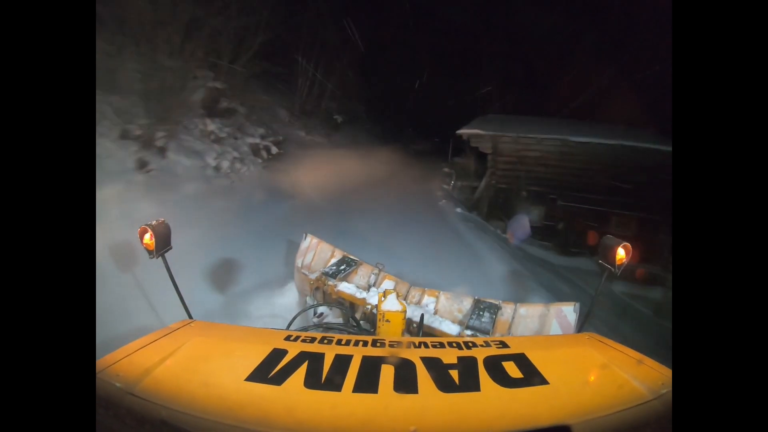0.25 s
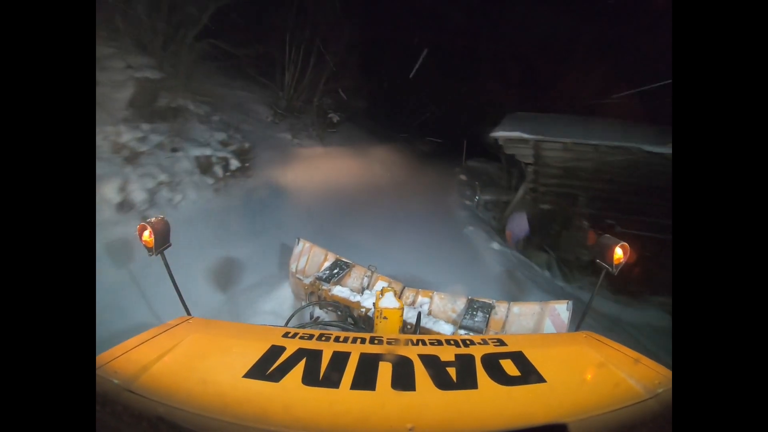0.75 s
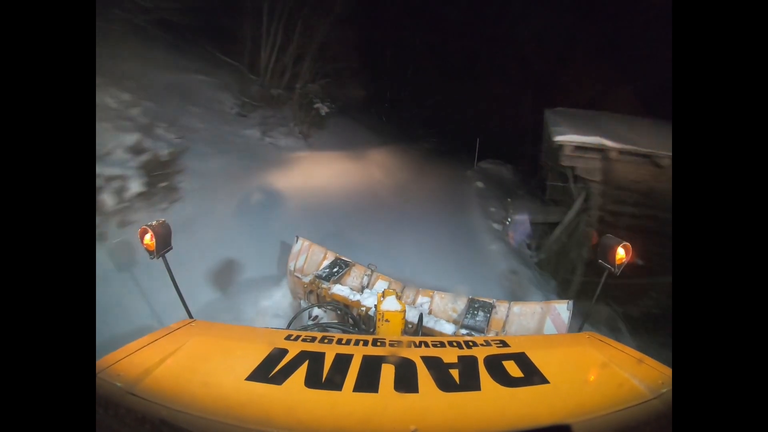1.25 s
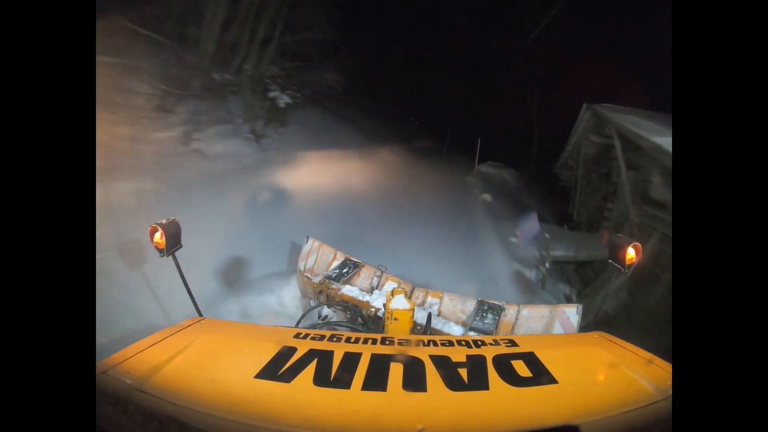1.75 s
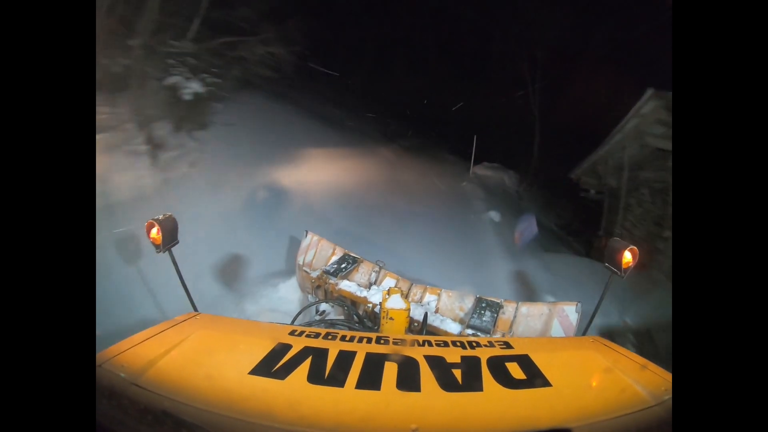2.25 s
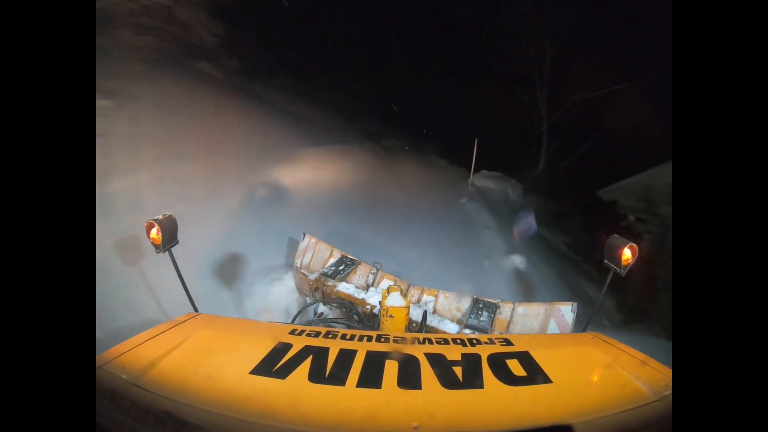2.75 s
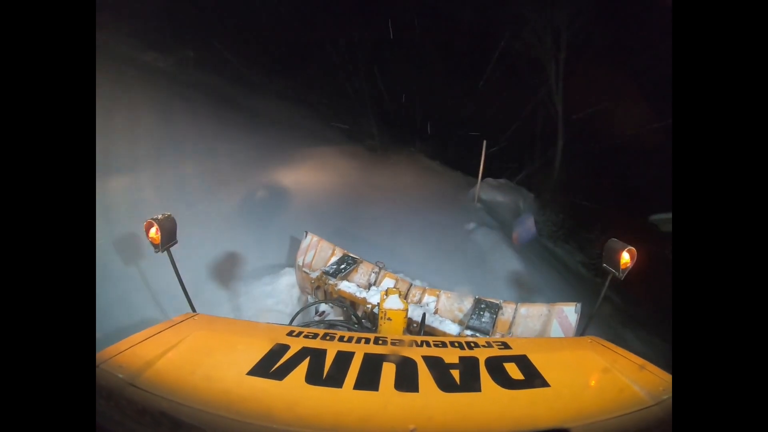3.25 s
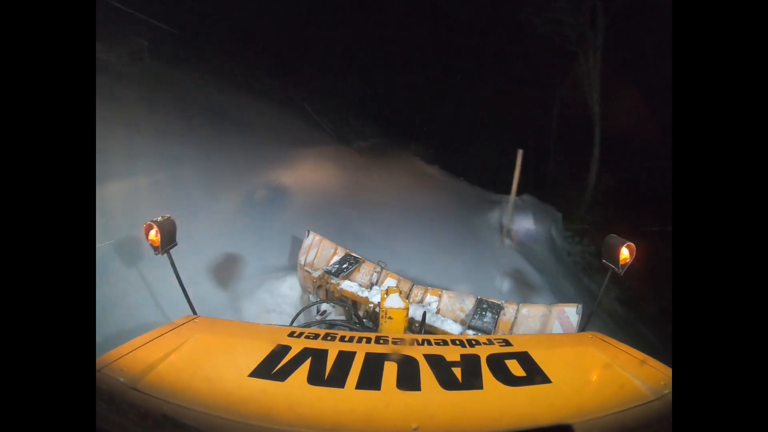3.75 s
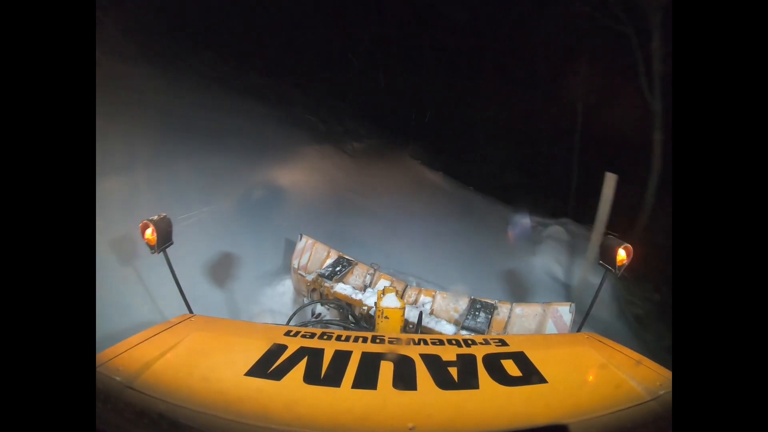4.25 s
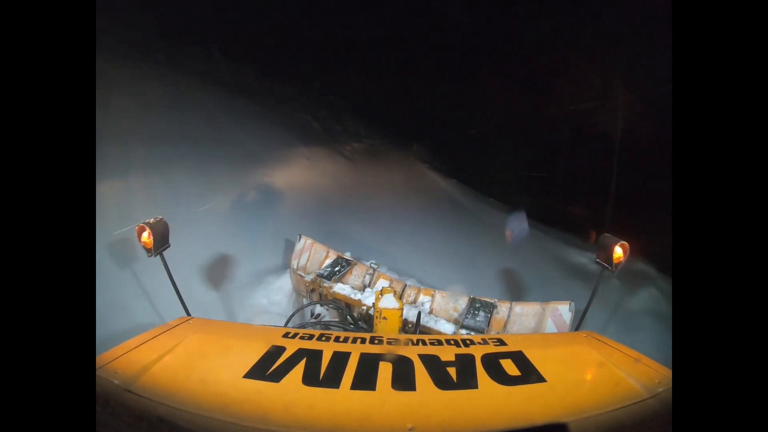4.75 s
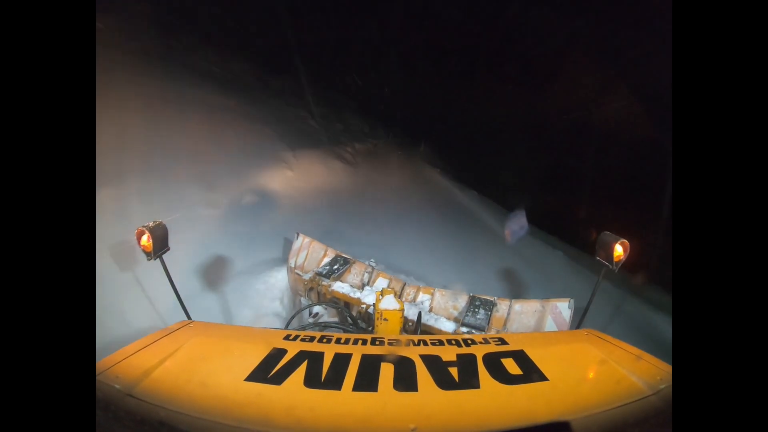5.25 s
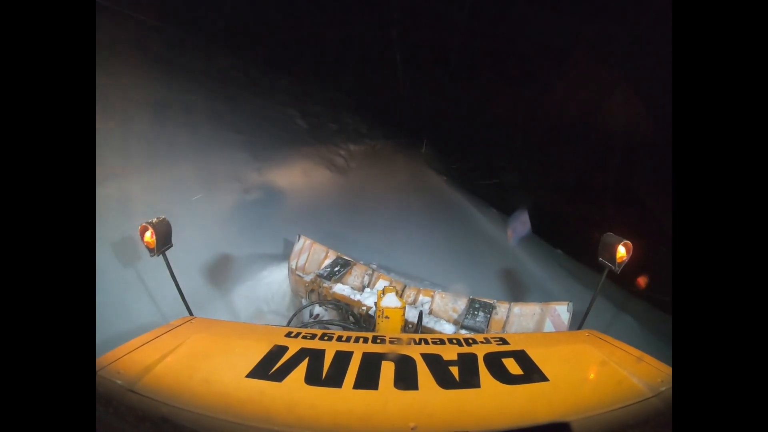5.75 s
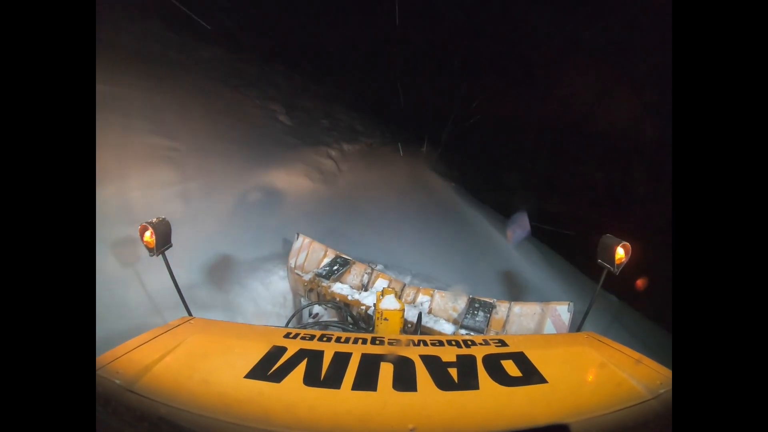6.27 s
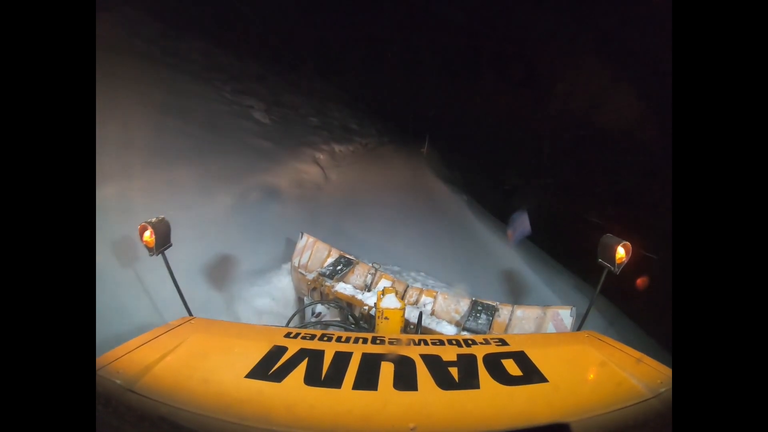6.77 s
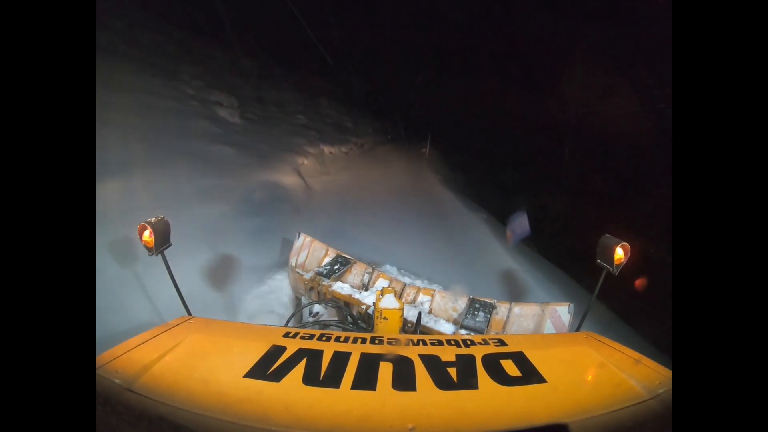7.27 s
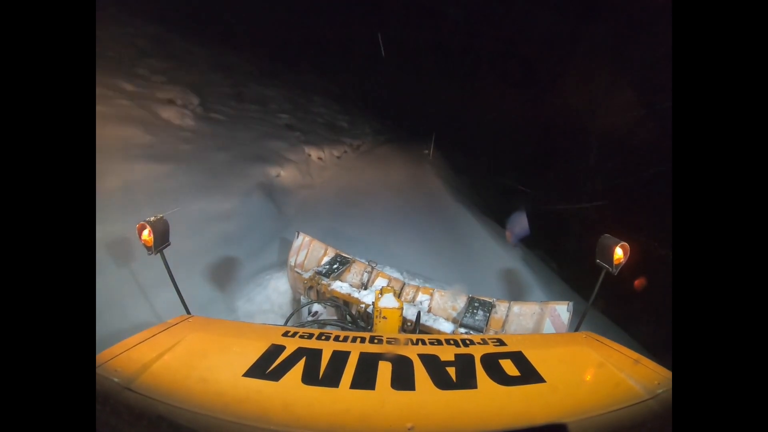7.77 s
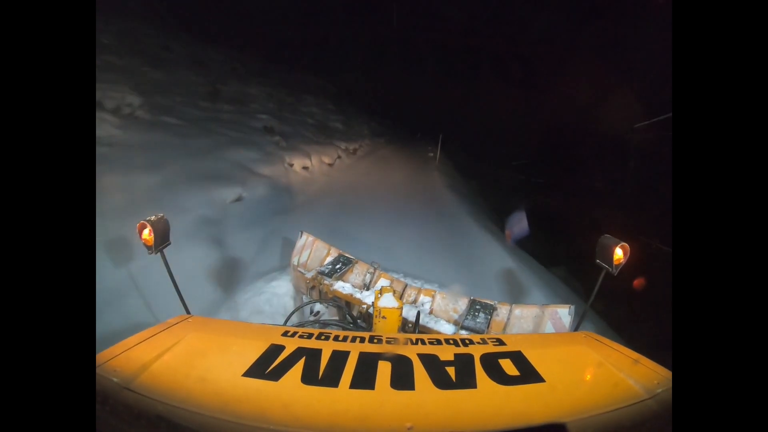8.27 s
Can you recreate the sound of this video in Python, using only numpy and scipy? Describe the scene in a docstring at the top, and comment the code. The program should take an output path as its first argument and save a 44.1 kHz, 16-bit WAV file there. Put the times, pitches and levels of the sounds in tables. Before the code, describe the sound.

Heard from the cab of a snow plow on a country lane, a deep diesel drone runs throughout over a low body rumble. Snow rushes off the steel blade, which drags and knocks over ruts, most in the first half. The engine gradually slows and deepens, a cluster of thuds and soft panel groans follows, and it picks up again near the end. Ice patters and loose fittings tick very faintly.

```python
"""Inside a snow plow

A six-cylinder diesel truck plows a country lane, heard from the cab. The exhaust booms deeper as the
engine labours and slows, the engine block clatters and gears whine. The blade rings, drags and pushes
rushing snow. Bumps shake the body, a panel groans, ice patters and small fittings tick."""
import sys
import numpy as np
from scipy import signal
from scipy.fft import rfft, irfft
from scipy.io import wavfile
from scipy.ndimage import uniform_filter1d, minimum_filter1d

SR = 44100
rng = np.random.default_rng(int(sys.argv[2]) if len(sys.argv) > 2 else 0)


def dump(signal):
    """Clip the signal to [-1, 1] and save it as 16-bit WAV at the path in sys.argv[1]."""
    limited = np.clip(np.atleast_2d(signal).T, -1, 1)
    pcm = np.round(limited * 32767).astype(np.int16)
    wavfile.write(sys.argv[1], SR, pcm)


N = 375291
TIME = np.arange(N) / SR
FREQ = np.arange(N // 2 + 1) * SR / N + 1e-6

# Tone colours of the noises. Each row: frequency in Hz, relative level in dB.
ICE_COLOUR = [(1500, -15), (3500, 2.5), (6500, 0), (10400, -4), (11500, -16.5), (15000, -32.5)]
DRONE_COLOUR = [(40, -21), (80, -5), (120, 1.5), (200, -3), (280, -4.5), (310, -7.5), (420, -9.5),
                (600, -33), (2000, -100)]
RUMBLE_COLOUR = [(8, -21), (16, -8), (24, -14), (32, 1.5), (37, 7.5), (45, 1.5), (58, 5.5), (85, -9),
                 (300, -100)]
RUSH_COLOUR = [(250, -26), (480, -1.5), (560, 0), (670, -2.5), (760, -2), (860, -5.5), (930, -8.5),
               (1150, -9.5), (1500, -11), (1900, -14.5), (2150, -15.5), (2600, -21.5), (3200, -30.5),
               (9000, -100)]
HISS_COLOUR = [(1500, -15.5), (2800, -4), (3800, -1.5), (4600, -8), (5400, -10), (6200, -14), (6800, -11),
               (7300, -20), (7950, -14.5), (8600, -23), (10400, -22.5), (11300, -30.5), (13700, -38),
               (15000, -47)]
SPRAY_COLOUR = [(1500, -13.5), (3600, 5.5), (5500, -3.5), (6800, -7), (7300, -13), (8000, -11.5),
                (8700, -14.5), (10400, -13.5), (11400, -18.5), (15000, -39.5)]
# Modes, the pitches a part rings at. Each row: pitch in Hz, width in Hz, relative level in dB.
PANEL_MODES = [(106.6, 18, -0.5), (139, 15, 0), (183.6, 13.2, 2.5), (244, 35, -4), (330, 31, -8),
               (397, 47, -9), (465, 27, -11)]
BLADE_MODES = [(603, 13, .5), (650, 14, -7), (714, 14, 2.5), (785, 45, -7), (860, 40, -8), (1205, 9, -6),
               (1424, 24, -10)]
EDGE_MODES = [(764, 34, 1.5), (836, 60, 0)]
BLOCK_MODES = [(1038, 23, 3.5), (1224, 6.9, -3), (1423, 30, 3), (1452, 19, -.5), (1508, 27, 0),
               (1707, 110, -1.5), (1850, 90, -4), (2302, 47, -4.5), (2396, 42, -1.5), (2457, 47, -5.5),
               (2625, 40, -3), (2810, 27, -12)]
# Sounds that swell and fade. Each row: start in seconds, peak level in dB.
LANE_RUTS = [(0.08, -21.5), (0.6, -32), (0.92, -22), (1.5, -19), (1.92, -20), (2.22, -25.5), (2.65, -18),
             (3.07, -22), (3.35, -27), (3.92, -21), (5.78, -25.5), (7.13, -26)]
SNOW_SPRAYS = [(0.675, -56), (2.22, -57), (2.39, -58), (2.5, -60), (2.77, -58), (3.4, -59), (3.545, -52.5),
               (3.655, -60), (5.34, -61), (6.43, -56)]
EDGE_SCRAPES = [(0.87, -47), (2.38, -40), (2.62, -38), (3.3, -41.5), (3.9, -42)]
# Faint, brief ticks and clacks. Each row: start in seconds, level in dB, pitch in Hz.
FITTING_TICKS = [(1.70, -66, 7940), (2.24, -57, 4802), (3.038, -58, 8990), (3.16, -56, 7500),
                 (3.895, -63, 6996), (4.555, -56, 5500), (5.37, -54, 5600), (5.62, -64, 4586),
                 (6.46, -57, 5500), (7.2, -37, 2380)]
SHORT_CLACKS = [(0.384, -17, 684), (0.43, -17, 603), (1.74, -22, 711), (3.343, -19, 724), (4.986, -17, 700)]
# Longer shudders. Each row: start in seconds, level in dB, pitch in Hz, fade time in seconds.
TRIM_SQUEAKS = [(2.04, -56, 10120, .04), (5.915, -60, 9430, 0.085)]
PANEL_GROANS = [(6.1, -27.5, 321.4, 0.14), (6.38, -29, 324.8, .14), (6.56, -29, 337, 0.092)]
BLADE_BUMPS = [(0.07, -15.5, 240, 0.036), (0.355, -19.5, 337, 0.052), (0.428, -17.5, 500, 0.022),
               (0.462, -20, 480, 0.027), (1.56, -13, 240, 0.031), (1.95, -21, 259.6, 0.066),
               (2.89, -23, 256, 0.086), (3.47, -24, 369.7, 0.078), (5.1, -24, 332, 0.052),
               (5.995, -12, 235.8, 0.05), (6.675, -20.5, 337, 0.06), (6.83, -21.5, 320.1, 0.047),
               (7.06, -28, 460, .04), (7.11, -12, 183, 0.044), (7.22, -20, 250, .03)]
# The load of snow on the blade, and how hard its edge bites. Each row: time in seconds, level in dB.
SNOW_LOAD = [(0, -29), (0.25, -34.5), (0.55, -31.5), (2.7, -30.5), (3.5, -30.5), (4.3, -30.5), (4.7, -33.5),
             (5.5, -34.5), (6.2, -35), (7.5, -35.5), (8.3, -34)]
EDGE_BITE = [(0, -46), (0.28, -43), (0.42, -36), (0.85, -36), (1.02, -31), (1.13, -39), (2.2, -32.5),
             (2.45, -37.5), (2.68, -33), (3.05, -37), (3.35, -33), (3.77, -43), (4.0, -36.5), (4.7, -39.5),
             (5.4, -39.5), (6.25, -53), (6.55, -41.5), (7.6, -41), (8.4, -38.5)]
# The engine sags, then recovers. Each row: time in seconds, firings per second.
ENGINE_SPEED = [(0, 65.6), (0.28, 65.23), (0.5, 65.4), (1.08, 63.88), (2.2, 64.22), (2.8, 65.38),
                (3.1, 64.9), (3.5, 65.52), (3.8, 64.15), (4.5, 62.18), (5, 62.75), (5.25, 60.87),
                (5.7, 60.18), (6.05, 57.63), (6.45, 57.94), (6.9, 58.51), (7.7, 60.24), (8.3, 62.53),
                (8.5, 62.9)]
# Tones of gears and belts. Each row: multiple of the firing rate, base level in dB.
GEAR_TONES = [(9.3, -49.5), (11.1, -53), (22.2, -55.5)]
# Tones of unequal cylinders. Each row: multiple of the six-firing cycle's rate, base level in dB.
CYLINDER_TONES = [(2, -32), (9, -35.5), (10, -28), (11, -38), (13, -30.5), (17, -31.5), (19, -33),
                  (22, -38.5), (24, -40), (26, -41), (34, -41), (35, -40.5), (39, -46.5)]
# How loudly the cab booms at each pitch. Each row: pitch in Hz, level in dB.
CAB_BOOM = [(57, -13.5), (62, -17), (65, -21), (68, -11), (115, -27), (118, -19.5), (123, -20),
            (130, -20.5), (134, -26.5), (174, -28), (183, -25.5), (186.5, -20.5), (189.5, -24),
            (192.5, -22), (196, -29.5)]
# The mode of the cab's air nearest each exhaust tone. Each row: pitch in Hz, width in Hz.
AIR_MODES = [(62, 130), (126, 47), (177, 18)]


def undb(db):
    """Turn decibels into a gain to multiply by."""
    return 10 ** (np.asarray(db) / 20)


def unit(x):
    """Scale a signal to an average power of 1."""
    return x / np.sqrt(np.mean(x ** 2))


def curve(table):
    """Join (time, value) rows with straight lines."""
    return np.interp(TIME, *np.transpose(table))


def noise():
    """White noise, an even hiss."""
    return rng.standard_normal(N)


def wander(hz, size=1000):
    """Smooth random motion, typically 1 in size, with up to about hz wiggles a second."""
    spectrum = rng.standard_normal(size) + 1j * rng.standard_normal(size)
    return unit(irfft(spectrum * np.exp(-.5 * (FREQ[:size] / hz) ** 2), N))


def colour(x, points):
    """Give x a tone colour, at power 1."""
    hz, db = np.transpose(points)
    gain = undb(np.interp(np.log(FREQ), np.log(hz), db))
    return unit(irfft(rfft(x) * gain, N))


def resonance(hz, width):
    """How one mode answers each frequency: most strongly at its own pitch."""
    return 1 / (1 + 1j * (FREQ ** 2 - hz ** 2) / (FREQ * width))


def ring(x, modes, wander_db):
    """Let x ring a part's modes, each slowly swelling and fading; the result has power 1."""
    spectrum, out = rfft(x), 0
    for hz, width, db in modes:
        steeper_sides = abs(resonance(hz, 5 * width))
        mode = irfft(spectrum * resonance(hz, width) * steeper_sides, N)
        out += undb(db + wander_db * wander(0.62)) * mode
    return unit(out)


def swells(table, rise_s):
    """A gain made of swells that each peak after rise_s and die away."""
    power = np.zeros(N)
    for start, db in table:
        age = np.maximum(TIME - start, 0) / rise_s
        power += (undb(db) * age * np.exp(1 - age)) ** 2
    return np.sqrt(power)


def shudders(table, width, rise_s):
    """Short dying bursts of noise; a smaller width gives a clearer pitch."""
    out, t = np.zeros(N + SR), TIME[:SR // 2]
    for start, db, hz, decay in table:
        band = signal.butter(2, [hz / (1 + width), hz * (1 + width)], "band", fs=SR, output="sos")
        vibration = signal.sosfilt(band, rng.standard_normal(SR))[-len(t):]
        envelope = (1 - np.exp(-t / rise_s)) * np.exp(-t / decay)
        level = undb(db) * np.sqrt(np.mean(envelope ** 2))
        first = int(start * SR)
        out[first:first + len(t)] += level * unit(envelope * vibration)
    return out[:N]


def ice_patter(per_second=16, decay_s=.017, spread_db=2.0, level_db=-75):
    """Stray bits of ice patter lightly on the cab, some harder than others."""
    hits = rng.random(N) < per_second / SR
    strength = undb(spread_db * np.clip(noise(), -2, 2))
    fading_power = signal.lfilter([1], [1, -np.exp(-1 / (decay_s * SR))], hits * strength ** 2)
    return undb(level_db) * colour(noise() * np.sqrt(fading_power), ICE_COLOUR)


def cab_fittings(tick_decay_s=0.013, muffle_hz=10300):
    """Loose fittings tick, with their highest treble softened; the trim squeaks and a panel groans."""
    ticks = shudders([(*tick, tick_decay_s) for tick in FITTING_TICKS], width=0.44, rise_s=.003)
    treble_cut = signal.butter(8, muffle_hz, fs=SR, output="sos")
    squeaks = shudders(TRIM_SQUEAKS, width=.035, rise_s=.04)
    groans = shudders(PANEL_GROANS, width=0.011, rise_s=0.022)
    return signal.sosfilt(treble_cut, ticks) + squeaks + groans


def truck_body(load_db, mount_hz=35.5):
    """The lane shakes frame and panels, more under load; each rut rocks the cab on its mounts."""
    frame = undb(3) * colour(noise(), DRONE_COLOUR)
    panels = undb(1) * ring(noise(), PANEL_MODES, wander_db=0.1)
    rumble = undb(-25.5 + 0.63 * load_db) * colour(noise(), RUMBLE_COLOUR)
    sway = np.sqrt(2) * np.sin(2 * np.pi * mount_hz * TIME + 0.87 * wander(8.1))
    rocking = swells(LANE_RUTS, rise_s=0.09) * sway
    drone = undb(-26 + 0.71 * load_db + wander(6.6)) * (frame + panels)
    return drone + rumble + rocking


def crunch(per_second, spread_db):
    """Tiny random fractures in the snow, most weak, a few strong."""
    cracks = (rng.random(N) < per_second / SR) * noise()
    return unit(cracks * undb(spread_db * np.minimum(rng.exponential(size=N), 2)))


def snow(load_db, crunchiness=0.33):
    """Snow rolls off the blade in surges, with fine crunching and brighter sprays on top."""
    rush = colour(noise() + crunchiness * crunch(2500, spread_db=2.2), RUSH_COLOUR)
    rush *= undb(-34.5 + 0.83 * load_db - 0.5 * wander(3.3))
    hiss = colour(noise() + crunchiness * crunch(900, spread_db=2.9), HISS_COLOUR)
    hiss *= undb(-54.5 + 0.52 * load_db + 0.3 * wander(14))
    sprays = swells(SNOW_SPRAYS, rise_s=0.026) * colour(noise(), SPRAY_COLOUR)
    return rush + hiss + sprays


def blade(clack_decay_s=0.0028):
    """The steel blade rings as it bites, drags over packed snow and thuds on bumps, amid faint clacks."""
    ringing = undb(curve(EDGE_BITE)) * ring(noise(), BLADE_MODES, wander_db=2.65)
    dragging = swells(EDGE_SCRAPES, rise_s=0.14) * ring(noise(), EDGE_MODES, wander_db=-1.5)
    clacks = 0
    for start, db, hz in SHORT_CLACKS:
        age = np.maximum(TIME - start, 0)
        envelope = (1 - np.exp(-age * hz * 2)) * np.exp(-age / clack_decay_s)
        clacks += undb(db) * envelope * np.sin(2 * np.pi * hz * age)
    thuds = shudders(BLADE_BUMPS, width=0.24, rise_s=0.00086)
    return ringing + dragging + clacks + thuds


def gears(firings, load, slack=0.9, flicker=0.18):
    """Gear teeth whine louder under load; the slack between them blurs each tone."""
    whine = 0
    for multiple, db in GEAR_TONES:
        level = undb(db) * (1 + flicker * wander(2.0))
        whine += level * np.cos(2 * np.pi * multiple * firings + slack * wander(5.1))
    return np.sqrt(2) * load * whine


def engine_clatter(firings, load, scatter_db=0.5, base_db=-42):
    """Each firing is a knock: a burst on top of steady noise that rings the engine block."""
    knock_number = firings.astype(int)
    strength = undb(scatter_db * rng.standard_normal(knock_number[-1] + 1))[knock_number]
    fade = np.exp(-(firings % 1) / 0.17)  # restarts at every firing
    knocks = noise() * (1 + strength * fade)
    return undb(base_db) * ring(knocks, BLOCK_MODES, wander_db=0.9) * load ** 0.32


def panel_boost(hz, floor_db=-12):
    """The gain of a gliding tone, which swells as it crosses a panel's own pitch."""
    grid_hz = np.arange(600)
    peaks = sum(1 / (1 + (2 * (grid_hz - pitch) / width) ** 2) ** 2 for pitch, width, _ in PANEL_MODES)
    return unit(np.interp(hz, grid_hz, np.sqrt(undb(floor_db) ** 2 + peaks)))


def exhaust(firings, firing_hz, load, waver=0.044, unevenness=0.2):
    """Firing pulses boom in the cab and waver under load; unequal cylinders add weaker tones."""
    out = 0
    for multiple, (pitch, width) in enumerate(AIR_MODES, 1):
        hz = multiple * firing_hz
        level = undb(np.interp(hz, *np.transpose(CAB_BOOM)))
        level *= 1 + waver * multiple * load * wander(4.1)
        lag = 2 * np.arctan(2 * (hz - pitch) / width)  # a tone lags as it rises through an air mode
        out += level * np.cos(2 * np.pi * multiple * firings - lag)
    for per_cycle, db in CYLINDER_TONES:
        multiple = per_cycle / 6  # six firings make one engine cycle
        tone = np.cos(2 * np.pi * (multiple * firings + rng.random()))
        level = undb(db) * load ** 0.48 * panel_boost(multiple * firing_hz)
        out += level * (1 + unevenness * wander(5.7)) * tone
    return np.sqrt(2) * out


def scene():
    """Cab, plow and engine, all heard from one spot inside."""
    firing_hz = curve(ENGINE_SPEED)
    firings = np.cumsum(firing_hz * (1 + 0.00181 * wander(4.6))) / SR  # running count
    snow_db = curve(SNOW_LOAD)
    load_db = snow_db - snow_db.mean()  # deeper snow works the truck harder
    load = undb(load_db)
    engine = exhaust(firings, firing_hz, load) + gears(firings, load) + engine_clatter(firings, load)
    plow = blade() + snow(load_db)
    cab = truck_body(load_db) + ice_patter() + cab_fittings()
    return (cab + plow + engine)[None]


def record(dry, threshold_db=-8, squeeze=0.51, hold_s=0.014, top_hz=15100):
    """A limiter turns down the loudest peaks, and the highest treble is cut."""
    hold = int(hold_s * SR)
    gain = np.minimum(1, undb(threshold_db) / (abs(dry) + 1e-9)) ** squeeze
    held = minimum_filter1d(gain, hold)
    smoothed = uniform_filter1d(uniform_filter1d(held, hold // 2), hold // 2)
    end_fades = np.minimum(1, np.minimum(TIME, TIME[::-1]) / .003)
    treble_cut = signal.ellip(8, .2, 70, top_hz, fs=SR, output="sos")
    return signal.sosfilt(treble_cut, dry * smoothed * end_fades)


dry = scene()
out = record(dry)
dump(out)
```